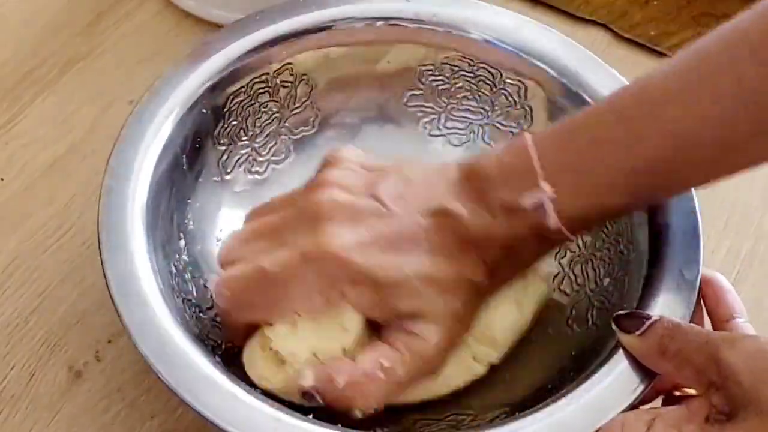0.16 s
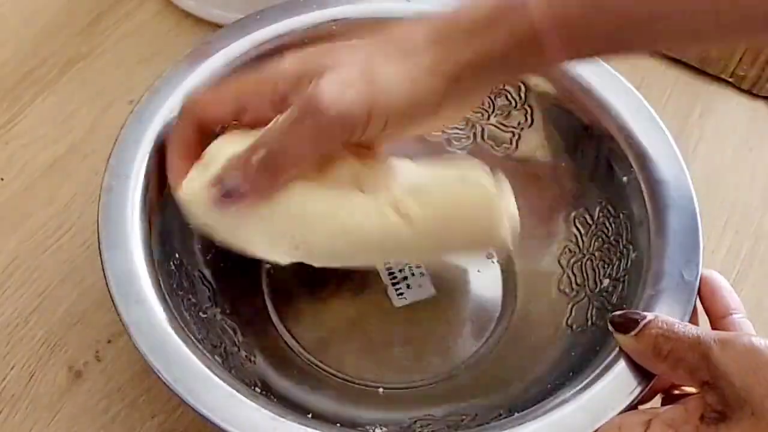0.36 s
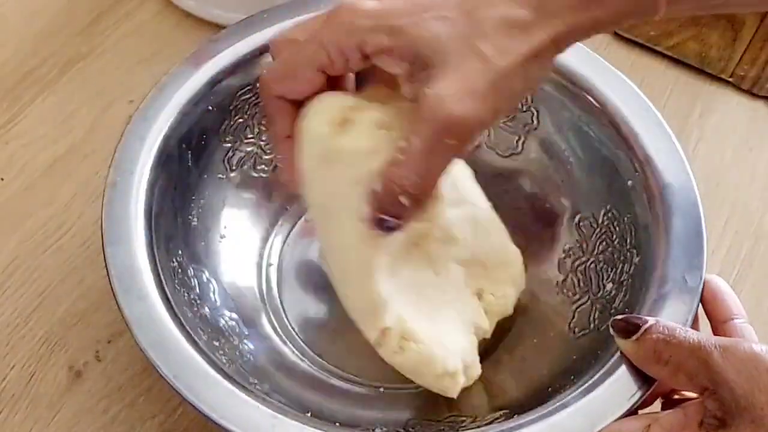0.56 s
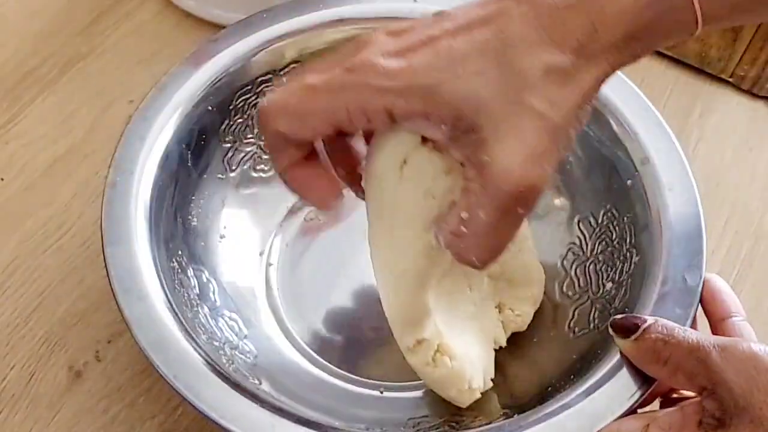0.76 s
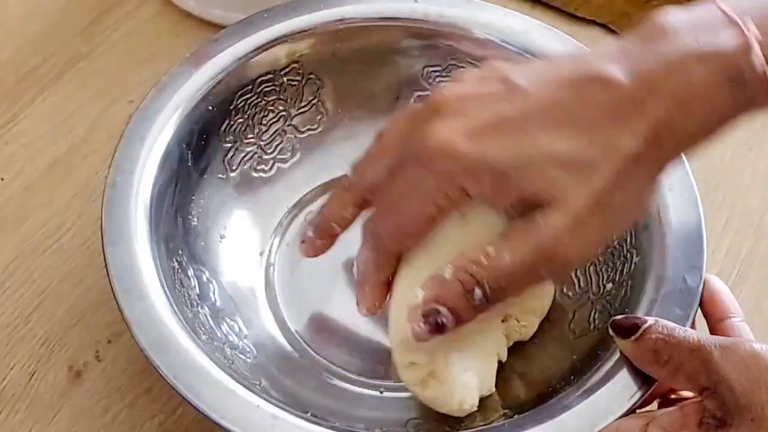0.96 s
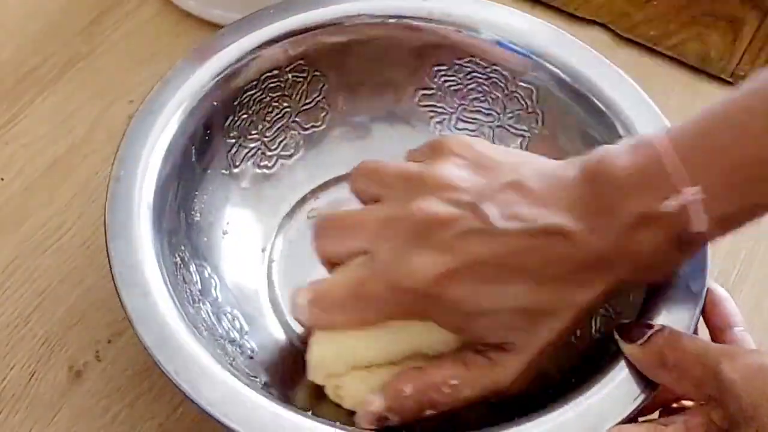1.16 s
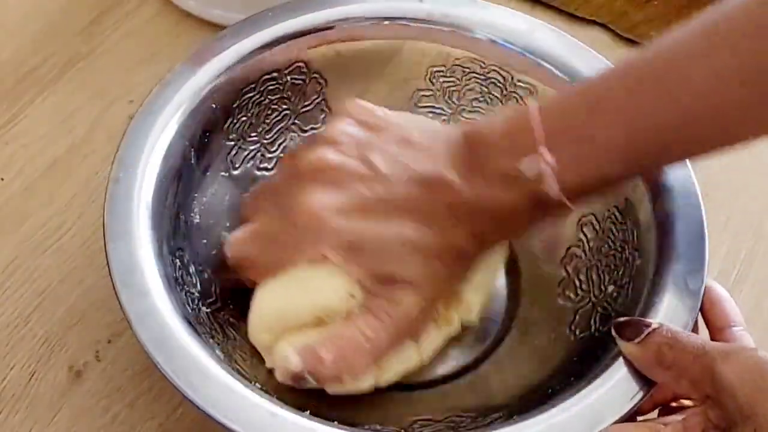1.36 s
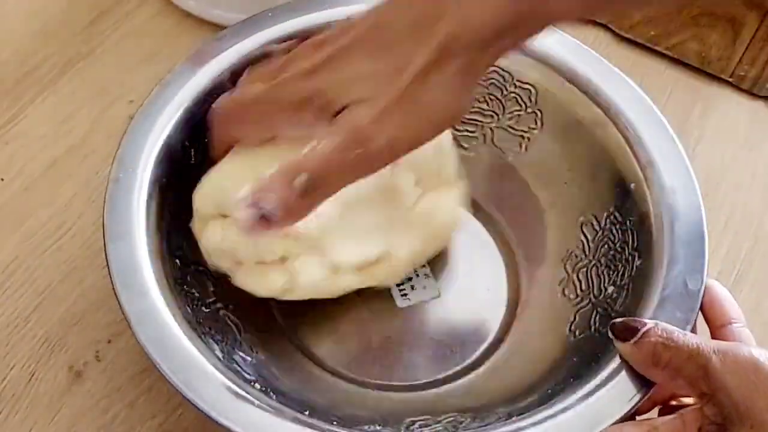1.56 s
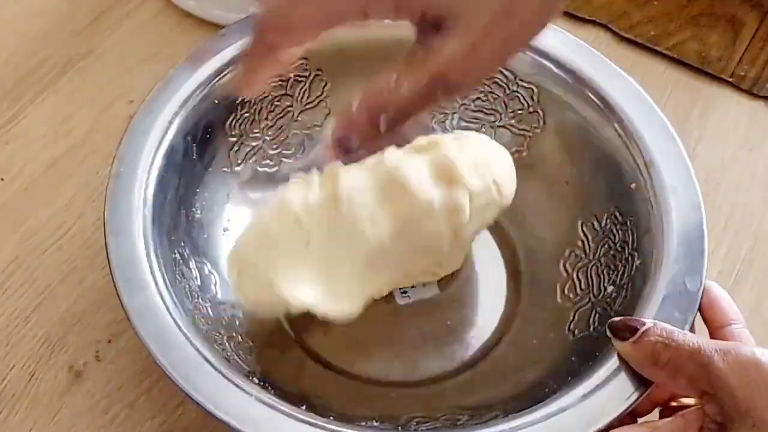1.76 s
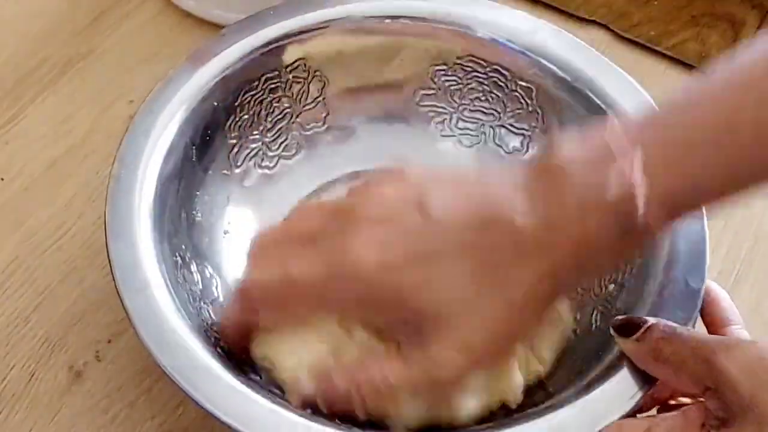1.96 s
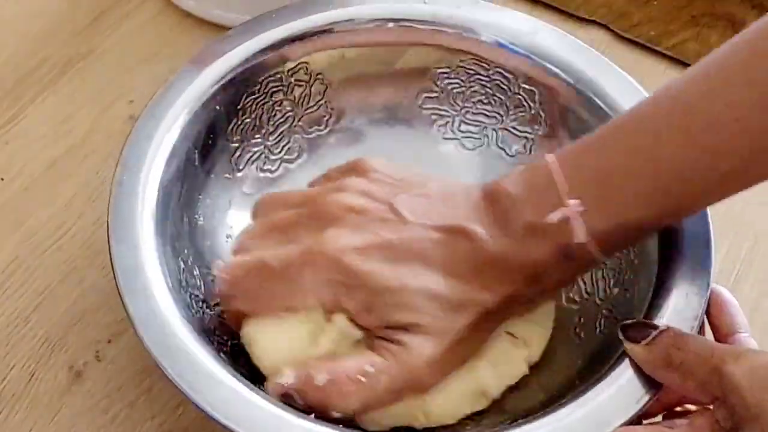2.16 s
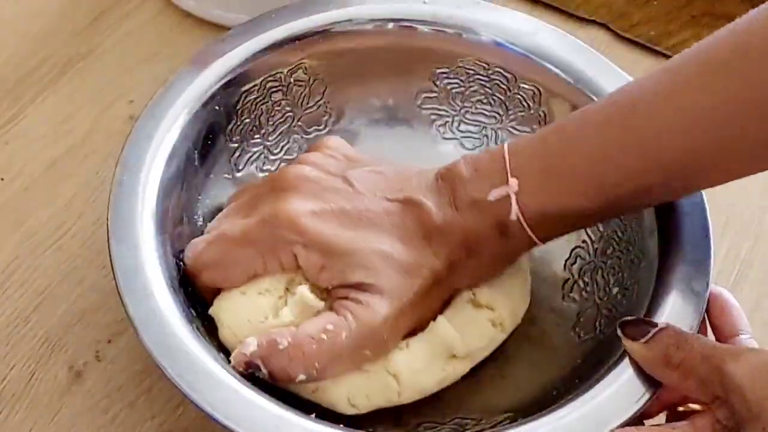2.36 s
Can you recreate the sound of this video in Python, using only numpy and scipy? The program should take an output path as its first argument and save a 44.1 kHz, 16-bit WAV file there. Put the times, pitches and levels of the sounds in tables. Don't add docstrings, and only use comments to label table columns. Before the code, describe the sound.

Hand kneading soft dough in a steel bowl: near quiet at first, a sharp cluster of bowl-on-wood knocks, then rubbing and softer bumps, a few light taps, and another firm smacking knock. Close phone microphone, small kitchen with low hum.

```python
import sys
import numpy as np
from scipy import signal
from scipy.fft import rfft, irfft
from scipy.io import wavfile
from scipy.ndimage import uniform_filter1d

SR = 44100
rng = np.random.default_rng(int(sys.argv[2]) if len(sys.argv) > 2 else 0)


def volts_from_decibels(level):
    exponent = np.asarray(level, float) / 20
    return 10 ** exponent


def wrap_up_sound(samples):
    columns = np.atleast_2d(samples).T
    tamed = np.clip(columns, -1, 1)
    steps = np.round(tamed * 32767).astype(np.int16)
    wavfile.write(sys.argv[1], SR, steps)


N = 105840


def evened(x):
    return x / np.sqrt(np.mean(x ** 2) + 1e-20)


def read(points, hz):
    f, value = np.transpose(points)
    return np.interp(np.log(hz + 1), np.log(f + 1), value)


def add(mix, start_s, sound):
    part = mix[round(start_s * SR):][:len(sound)]
    part += sound[:len(part)]


def swell(start_s, length_s):
    return np.sin(np.pi * np.clip((np.arange(N) / SR - start_s) / length_s, 0, 1)) ** 2


def noise(colour_db, same, patchy_db):
    frames, hz = N // 256 + 5, np.fft.rfftfreq(1024, 1 / SR)
    a, b, c, d, patches = rng.standard_normal((frames, 513, 5)).T
    patches = uniform_filter1d(patches, size=10, axis=0)
    patches = evened(uniform_filter1d(patches, size=10, axis=1))
    likeness = np.clip(same(hz), -1, 1)[:, None]
    left = a + 1j * b
    right = likeness * left + np.sqrt(1 - likeness ** 2) * (c + 1j * d)
    level = volts_from_decibels(colour_db(hz)[:, None] + patchy_db * patches)
    z = np.array([left, right]) * level
    return evened(signal.istft(z, nperseg=1024, noverlap=768)[1][:, :N])


def ring(modes, focus_hz, hold=1):
    focus_oct, focus_floor = 0.29, 0.51
    spread_s = 0.00094
    hz, db, t60 = np.transpose(modes)[:, :, None]
    t = np.arange(SR // 2) / SR
    near = focus_floor + np.exp(-(np.log2(hz / focus_hz) / focus_oct) ** 2)
    fade = volts_from_decibels(db - 60 * t / (hold * t60))
    tones = near * (1 - np.exp(-t / spread_s)) * fade * np.sin(2 * np.pi * hz * t)
    return tones.sum(0)


# pitch in Hz, level in dB, time to die by 60 dB in seconds.
TABLE_MODES = [(71, -6, 0.28), (124, -31.5, 0.089), (135.7, -2, 0.1), (170, 1.5, 0.051), (270.8, 1, 0.058),
               (361, 5, 0.026), (444, 6.5, 0.033), (500, -4, 0.058), (526, -13.5, 0.14), (390, -27, 0.0045)]
# pitch in Hz, level in dB,
# time to die by 60 dB in seconds.
BOWL_MODES = [(867, -5.5, 0.1), (913, -5.5, 0.07), (1014.5, 8, 0.032), (1131, 14.5, 0.011),
              (1320, 18, 0.0095), (1522, 15, 0.011), (1500, -18, 0.058), (1918, 0.5, 0.028),
              (2300, 3, 0.019), (2800, -52, 0.019), (3750, -35, .015), (4030, 1.5, 0.014), (6050, -46, .05),
              (7241, -42, .05)]
# start in seconds, force in dB, contact time in ms,
# share of bowl sound in dB, favoured pitch in Hz.
KNOCKS = [(0.2097, -38, 0.44, -13, 900), (0.2165, -21.5, 1.13, 4, 606), (0.2175, -13.5, 1.11, 6.5, 470),
          (.2218, -13, 1.97, -9, 262), (0.2275, -11, 3.2, 3.5, 500), (0.2364, -23.5, 1.9, -17, 398),
          (0.2474, -31, 0.52, -2, 495), (.271, -28, 1, -16, 440), (0.286, -28.5, 0.84, -1.5, 170),
          (0.353, -30, 3.5, 2, 160), (0.392, -46, 0.53, -7, 900), (0.555, -35, 2.3, 7, 417),
          (1.228, -23.5, 9.1, -20, 99), (1.247, -33.5, 5, -20, 100), (1.571, -31.5, 1.6, -12, 202),
          (1.585, -41, 3, -10, 154), (1.7229, -27, 1.7, -6, 167), (1.7292, -28.5, 1.74, 5.5, 420),
          (1.734, -31.5, 2.2, -16, 408), (1.744, -31, 1.8, 3, 700), (1.782, -29, 6.5, -18, 195),
          (2.107, -27, 2.2, -1, 474), (2.114, -23, 0.65, -6.5, 1010), (2.1228, -34.5, 0.8, 12.5, 577),
          (2.1260, -28.5, 1.95, 4, 530), (2.196, -31.5, 1.7, -11, 175), (2.239, -36, 2.8, -20, 125)]


def knocks():
    out = np.zeros(N)
    for start_s, force_db, contact_ms, bowl_db, focus_hz in KNOCKS:
        rise_s = max(contact_ms, .05) * 0.00064 / 4
        u = np.arange(SR // 50) / SR / rise_s
        force = u * np.exp(-u)
        body = ring(TABLE_MODES, focus_hz) + volts_from_decibels(bowl_db) * ring(BOWL_MODES, focus_hz)
        add(out, start_s, volts_from_decibels(force_db) * signal.fftconvolve(force / force.sum(), body))
    return out


# start in seconds, level in dB, pitch in Hz,
# time to die by 60 dB in seconds.
SNAPS = [(.144, -60, 4480, .03), (.2172, -19, 829, 0.039), (.2275, -21, 828, 0.056),
         (0.224, -47, 6050, 0.033), (0.255, -35.5, 1500, .04), (.286, -43, 990, 0.031),
         (0.559, -57, 3980, .05), (1.188, -58, 4900, 0.05), (1.252, -57, 6540, 0.033),
         (1.27, -56, 7100, .05), (1.558, -48, 2420, 0.031), (1.567, -42, 1794, 0.046),
         (1.574, -52, 4460, .03), (1.575, -36.5, 1775, 0.023), (1.582, -38, 2330, 0.023),
         (1.592, -56, 4000, .04), (1.7205, -39, 2163, 0.038), (1.721, -52.5, 4360, 0.044),
         (1.722, -32.5, 1300, .03), (1.728, -34, 1110, 0.012), (1.73, -50, 4070, .04),
         (1.73, -63, 6000, 0.019), (1.772, -41, 1360, .025), (2.1065, -37, 1990, 0.037),
         (2.114, -24, 1400, .02), (2.1153, -38, 4080, 0.013), (2.116, -32.5, 1934, 0.02),
         (2.1135, -26.5, 1850, 0.024), (2.119, -23.5, 572, 0.082), (2.126, -33.5, 6660, 0.022),
         (2.13, -44, 900, 0.026)]


def snaps():
    rise_s, longest_s = 0.0004, .07
    out, t = np.zeros(N), np.arange(4096) / SR
    for (start_s, db, hz, t60), (a, b) in zip(SNAPS, rng.random((len(SNAPS), 2))):
        first = np.sin(2 * np.pi * hz * t)
        second = .5 * np.sin(2 * np.pi * (hz * (0.93 + 0.058 * a) * t + b))
        fade = volts_from_decibels(db - 60 * t / min(t60, longest_s))
        add(out, start_s, (first + second) * (1 - np.exp(-t / rise_s)) * fade)
    return out


# time in seconds, level in dB.
PRESS = [(0, -81), (.21, -72), (.24, -51), (.4, -37.5), (.6, -65), (1.201, -48), (1.6, -48.5), (1.75, -51),
         (2.052, -46.5), (2.13, -43), (2.4, -49.5)]


def shake():
    grip = 0.69
    slips = volts_from_decibels(2.13 * rng.exponential(1, N)) * (rng.random(N) < 900 / SR)
    slips = slips * rng.choice([-1., 1.], N)
    slips = evened(uniform_filter1d(slips, size=16))
    body = ring(TABLE_MODES, 340, grip) + volts_from_decibels(-2.5) * ring(BOWL_MODES, 2140, grip)
    press = volts_from_decibels(np.interp(np.arange(N) / SR, *np.transpose(PRESS)))
    return signal.fftconvolve(slips * press, body)[:N] / np.linalg.norm(body) / 4


# start in seconds, length in seconds, pitch in Hz.
DRAGS = [(.27, .12, 155), (.43, .15, 143), (.7, .45, 335), (.86, .3, 475), (.7, .28, 150),
         (1.575, .2, 1770), (2.118, .055, 1030), (1.77, .04, 185), (1.95, .075, 140), (2.105, .07, 60),
         (2.21, .08, 125), (.3, .28, 66), (.36, .05, 885), (1.738, .035, 920), (.54, .045, 435),
         (1.72, .03, 435), (2.175, .07, 60), (2.255, .08, 65), (2.345, .07, 66), (2.18, .04, 175),
         (2.165, .04, 1030), (.33, .16, 7250), (.54, .06, 70), (1.22, .06, 80)]
# level in dB, in the same order.
DRAGS_DB = [-43, -38.5, -46.5, -51.5, -47.5, -58, -34.5, -41, -40, -37, -43, -48.5, -38.5, -38, -40, -34,
            -37, -40.5, -42.5, -36, -45, -66, -46, -48]


def drags():
    wander, flutter_db = .008, 1.5
    drift = rng.standard_normal((len(DRAGS), 2, N // 64 + 2))
    drift = uniform_filter1d(drift, size=16, axis=2) * 4
    out = np.zeros(N)
    for (start_s, length_s, mode_hz), db, moves in zip(DRAGS, DRAGS_DB, drift):
        pitch, level = [np.interp(np.arange(N) / 64, np.arange(len(v)), v) for v in moves]
        tone = np.sin(2 * np.pi * np.cumsum(mode_hz * (1 + wander * pitch)) / SR)
        out += volts_from_decibels(db + flutter_db * level) * swell(start_s, length_s) ** .5 * tone
    return out


# pitch in Hz, lead in radians.
LEAD = [(60, -0.18), (250, -0.41), (500, 0.71), (1000, 1.77), (2000, 0.75), (4000, 1.7), (16000, 1.7)]
# pitch in Hz, left minus right in dB.
TILT = [(60, 1), (150, 2), (500, -3), (1000, 0.5), (15000, -1.5)]


def ports(x):
    hz, z = np.fft.rfftfreq(N, 1 / SR), rfft(x)
    half = volts_from_decibels(read(TILT, hz) / 2) * np.exp(.5j * read(LEAD, hz))
    return irfft(np.array([z * half, z / half]), N)


# start in seconds, level in dB, fade in seconds,
# centre pitch in Hz.
SMACKS = [(0.046, -58, 0.04, 8700), (0.212, -44.5, .05, 4000), (0.2167, -30.5, 0.05, 4740),
          (0.3923, -47, 0.041, 3280), (.462, -46, 0.0075, 4580), (0.558, -60, 0.06, 3760),
          (1.187, -60, 0.085, 4670), (1.559, -50.5, 0.073, 2300), (1.574, -52, 0.12, 2980),
          (1.729, -59, 0.029, 4000), (1.616, -72, .03, 6000), (1.654, -51, 0.013, 4660),
          (1.7187, -49.5, 0.15, 3500), (2.1054, -37, 0.15, 6100), (2.1132, -30.5, 0.035, 2550)]


def smacks():
    tail_db, tail_s = -22, 0.88
    size = 16384
    near, far = np.zeros(N), np.zeros((2, N))
    t, hz = np.arange(size) / SR, np.fft.rfftfreq(size, 1 / SR)
    for (start_s, db, fade, centre_hz), grit in zip(SMACKS, rng.standard_normal((len(SMACKS), 4, size))):
        colour = volts_from_decibels(-6.0 * np.log2((hz + 1) / centre_hz) ** 2)
        tone = evened(irfft(rfft(grit[:3]) * colour))
        lumps = volts_from_decibels(2.0 * evened(uniform_filter1d(grit[3], size=70)))
        attack = np.minimum(t / (0.0073 * fade), 1)
        add(near, start_s, tone[0] * lumps * attack * volts_from_decibels(db - 60 * t / fade))
        tail = tone[1:] * np.minimum(t / 0.0038, 1) * volts_from_decibels(db + tail_db - 60 * t / tail_s)
        add(far.T, start_s, tail.T)
    return ports(near) + far


# start in seconds, length in seconds, level in dB,
# centre pitch in Hz.
STROKES = [(-.1, 0.39, -71.5, 8500), (0.198, .16, -52, 1390), (0.193, 0.31, -63.5, 4640),
           (0.24, 0.25, -61.5, 13000), (0.353, 0.26, -67, 7540), (0.45, 0.41, -70.5, 13200),
           (1.107, 0.72, -65, 9900), (1.185, 0.15, -64, 7600), (1.454, 0.16, -64.5, 12800),
           (1.474, 0.13, -59, 3100), (1.575, 0.19, -74, 7500), (1.662, 0.2, -65.5, 10200),
           (1.69, 0.73, -68, 2020), (2.08, 0.4, -70.5, 6240), (2.25, 0.27, -65.5, 11100),
           (1.598, .1, -61.5, 3230), (1.603, .085, -70, 13000), (1.693, 0.07, -74, 13600)]


def strokes():
    hz = np.fft.rfftfreq(N, 1 / SR)
    grain = volts_from_decibels(1.0 * rng.exponential(1, N)) * (rng.random(N) < 400 / SR)
    grain = evened(uniform_filter1d(grain, size=80))
    hiss = noise(lambda f: 0 * f, lambda f: 0.033 + 0 * f, patchy_db=0.0)
    z = rfft(hiss * (1 + 0.091 * grain))
    out = np.zeros((2, N))
    for start_s, length_s, db, centre_hz in STROKES:
        colour = volts_from_decibels(-6 * np.log2((hz + 1) / centre_hz) ** 2)
        out += volts_from_decibels(db) * swell(start_s, length_s) * evened(irfft(z * colour, N))
    return out


# pitch in Hz, likeness from -1 to 1.
SAME = [(60, 1), (180, 0.86), (350, 0.66), (550, 0.41), (1650, -0.14), (4970, -0.21), (15000, 0.098)]
# pitch in Hz, time to die by 60 dB in seconds.
ROOM = [(90, 0.45), (300, 0.45), (1000, 0.6), (3000, 0.99), (10000, 0.3)]


def room(x):
    taps = np.zeros((2, SR))
    at = np.arange(200, SR - 20, 20) + rng.integers(0, 20, (2, (SR - 201) // 20))
    np.put_along_axis(taps, at, rng.choice([-1., 1.], at.shape), 1)
    hz, t, z = signal.stft(taps, SR, nperseg=512)
    likeness = np.clip(read(SAME, hz), 0, 1)[:, None]
    right = likeness * z[0] + np.sqrt(1 - likeness ** 2) * z[1]
    fade = volts_from_decibels(-60 * t / read(ROOM, hz)[:, None])
    tail = signal.istft(np.array([z[0], right]) * fade, SR, nperseg=512)[1]
    return signal.fftconvolve(x[None], tail / np.linalg.norm(tail[0]), axes=1)[:, :N]


# pitch in Hz, level in dB per Hz.
HUM = [(25, -8), (125, -1), (400, -7), (1000, -12), (2200, -21), (3500, -34.5), (7600, -45.5),
       (16000, -51.5)]
# pitch in Hz, width in Hz, boost (or cut, if negative) in
# dB.
HUM_PEAKS = [(36.2, 8.4, -1), (74.7, 12, -12), (97, 10, -4), (188, 14.7, 8), (350.6, 15, 7.5),
             (490, 24, 2.5), (722, 54, -9.5), (900, 120, 2)]


def kitchen():
    def colour(f):
        peaks = sum(db * np.exp(-((f - hz) / width) ** 2) for hz, width, db in HUM_PEAKS)
        return read(HUM, f) + peaks
    return volts_from_decibels(-46) * noise(colour, lambda f: read(SAME, f), patchy_db=1.0)


def scene():
    low_cut = signal.butter(3, 78, "high", fs=SR, output="sos")
    thud = signal.sosfilt(low_cut, knocks() + shake() + snaps())
    near = ports(thud + drags())
    echo = room(volts_from_decibels(-8) * thud)
    return near + echo + smacks() + strokes() + kitchen()


def roll_off(x):
    return signal.sosfilt(signal.butter(12, 15800, fs=SR, output="sos"), x)


def record(dry):
    mix = signal.oaconvolve(dry, signal.firwin(255, 15750, fs=SR)[None], "same")
    return roll_off(mix)


dry = scene()
out = record(dry)
wrap_up_sound(out)
```